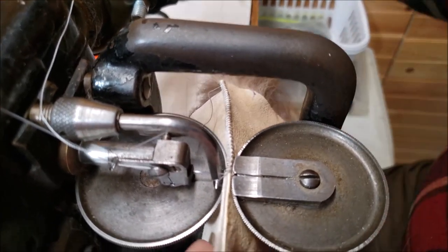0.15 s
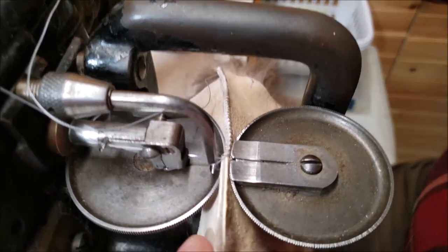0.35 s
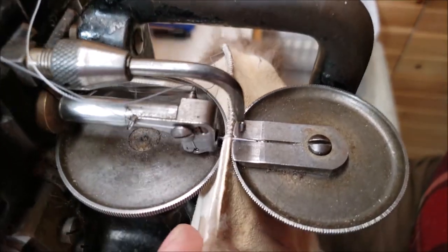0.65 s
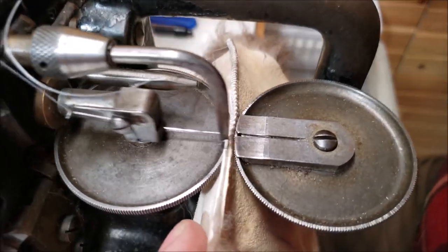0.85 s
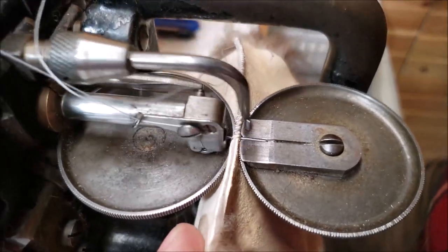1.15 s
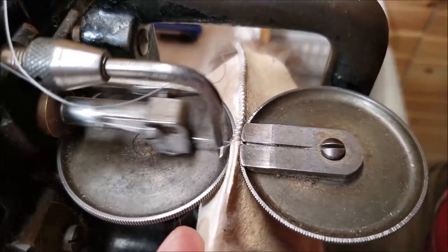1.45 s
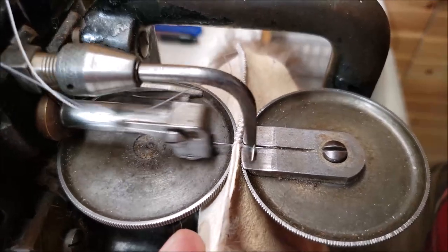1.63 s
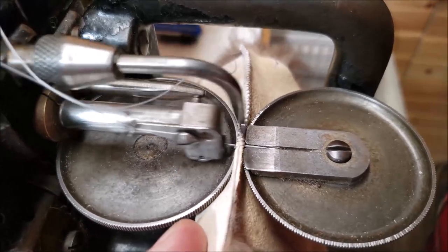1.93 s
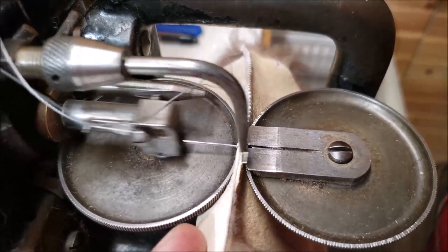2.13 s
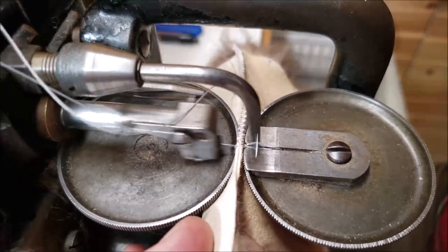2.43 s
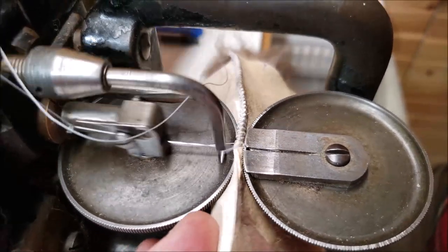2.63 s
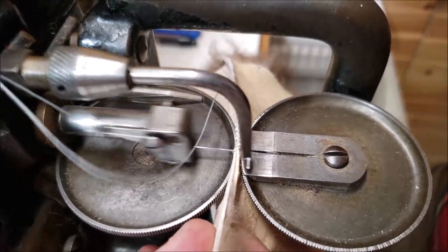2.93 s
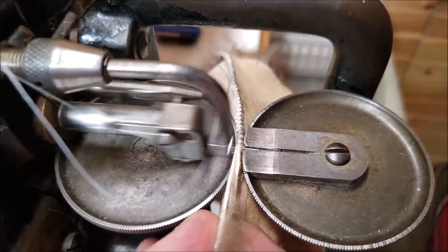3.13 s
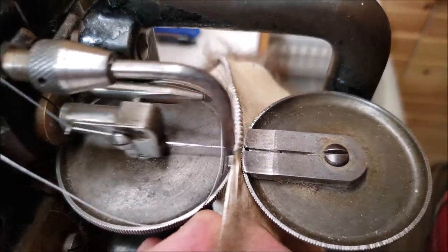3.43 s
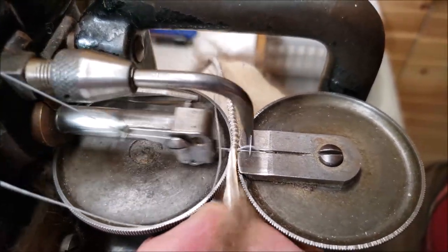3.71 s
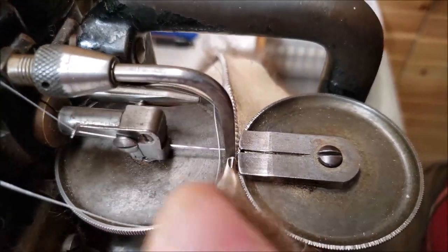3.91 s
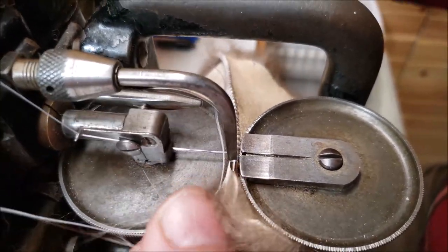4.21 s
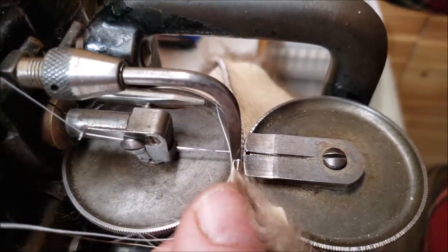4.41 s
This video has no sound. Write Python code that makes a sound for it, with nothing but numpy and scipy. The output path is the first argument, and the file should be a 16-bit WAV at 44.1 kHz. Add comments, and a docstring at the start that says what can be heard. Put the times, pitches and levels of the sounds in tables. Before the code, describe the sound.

An old hand-cranked sewing machine stitches fur close to the microphone in a small, quiet room. It starts with a few light clicks and a soft table thump, then settles into quick metallic ticks, clacks and rattles, a little over two stitches a second, with a thin scrape on each. Two harder snaps stand out midway. Near the end it stops, leaving a faint rustle of fingers on fur.

```python
"""Hand-cranked fur sewing machine

The machine stitches close to a phone, then stops. Cams, looper and feed ratchet excite the modes of
its steel parts by impact and by friction; the cast frame and table rumble, and fingers rustle the fur.
The phone's two microphone ports colour the sound very differently, and the right one hears it later."""
import sys
import numpy as np
from scipy import signal
from scipy.fft import rfft, irfft
from scipy.io import wavfile
from scipy.ndimage import uniform_filter1d

SR = 44100
rng = np.random.default_rng(int(sys.argv[2]) if len(sys.argv) > 2 else 0)


def to_wav(sig):
    """Store sig (one row per channel, or 1-D mono) as 16-bit WAV at the path in sys.argv[1].

    Samples outside -1..1 are clipped; the rate is SR.
    """
    pcm = np.clip(np.atleast_2d(sig), -1, 1) * 32767
    pcm = np.round(pcm).astype(np.int16)
    wavfile.write(sys.argv[1], SR, pcm.T)  # frames by channels


N = 201349
T = np.arange(N) / SR


def undb(db):
    """Amplitude ratio of a level in decibels."""
    return 10 ** (np.asarray(db) / 20)


def unit(x):
    """Normalisation to an rms of 1 along time."""
    return x / np.sqrt(np.mean(x ** 2, axis=-1, keepdims=True))


def level_curve(table):
    """Linear interpolation of levels in dB over time, silent outside the table."""
    return np.interp(T, *np.transpose(table), left=-120, right=-120)


def decay(t, t60):
    """Exponential damping: a fall of 60 dB in t60."""
    return np.exp(-np.log(1000) * t / t60)


def swells(times, db, sigma_s):
    """Gaussian envelopes centred on the given times."""
    rows = zip(*np.broadcast_arrays(times, db, sigma_s))
    return sum(undb(level) * np.exp(-.5 * ((T - s) / sigma) ** 2) for s, level, sigma in rows)


def pair(draw, coherence):
    """Partial coherence: two ports facing different sides of a source share only part of its power."""
    return np.sqrt(coherence) * draw() + np.sqrt(1 - coherence) * np.array([draw(), draw()])


def grains(spread_db):
    """Surface roughness: dense tiny contacts of very uneven, but bounded, size."""
    size = np.minimum(rng.exponential(size=N), 6)
    return rng.standard_normal(N) * undb(spread_db * size)


def resonate(force, peaks):
    """Forced vibration of broad resonances in parallel, each made of two band-passes in series."""
    out = 0
    for hz, width, db in peaks:
        wide = signal.lfilter(*signal.iirpeak(hz, hz / width / 2, SR), force)
        out = out + undb(db) * signal.lfilter(*signal.iirpeak(hz, hz / width, SR), wide)
    return unit(out)


# Room tone. Each row: frequency in Hz, spectral density in dB.
AIR_SPECTRUM = [(40, -90), (100, -105), (250, -102), (500, -112), (2000, -116), (6000, -114), (12000, -112),
                (16000, -110)]


def room_tone():
    """Diffuse background noise is almost incoherent between the ports."""
    hz, db = np.transpose(AIR_SPECTRUM)
    tilt = undb(np.interp(np.log(np.fft.rfftfreq(N, 1 / SR) + 1), np.log(hz), db))
    noise = pair(lambda: rng.standard_normal(N), coherence=0.074)
    return irfft(rfft(noise) * tilt, N) * np.sqrt(SR / 2)


# Resonances of the table. Each row: frequency in Hz, bandwidth in Hz, relative level in dB.
TABLE_MODES = [(53, 44, 13), (68, 19, 9), (93, 110, -18)]
# Shaking of the table. Each row: time in seconds, level in dB before each port's gain.
SHAKE_LEVELS = [(0.0, -60), (0.08, -74), (0.14, -52.5), (0.33, -59), (0.37, -39.5), (0.53, -65.5),
                (0.57, -50), (0.63, -68.5), (1.09, -64), (1.35, -49.5), (1.6, -59), (1.64, -49.5),
                (3.1, -62.5), (3.29, -47.5), (3.46, -62), (3.66, -53.5), (3.88, -64), (3.93, -48),
                (4.19, -68), (4.57, -73.5)]


def table_shake():
    """Random forcing of the table's low resonances makes a rumble, stronger at the right port."""
    force = pair(lambda: rng.standard_normal(N), coherence=0.67)
    return resonate(force, TABLE_MODES) * undb(level_curve(SHAKE_LEVELS)) * undb([[-1.5], [2.5]])


# Soft knocks. Each row: start in seconds, relative level in dB, frequency in Hz, T60 in seconds.
TABLE_KNOCKS = [(.002, -45.5, 59, 0.078), (0.15, -36, 111, 0.032), (0.266, -32.5, 94, 0.013),
                (0.353, -38.5, 92, 0.08), (0.356, -37.5, 780, 0.012), (0.377, -54, 88, 0.067),
                (0.421, -51, 79, 0.086), (.565, -35, 85, 0.036), (2.585, -29, 537, 0.033)]


def table_knocks():
    """Structure-borne knocks: damped sinusoids that reach the right port best."""
    out = 0
    for start, db, hz, t60 in TABLE_KNOCKS:
        t = np.clip(T - start, 0, None)
        out = out - np.sin(2 * np.pi * hz * t) * decay(t, t60) * undb(db)
    return out * undb([[-1], [5.5]])


# Spectrum of the fur. Each row: frequency in Hz, bandwidth in Hz, relative level in dB.
FUR_BANDS = [(2670, 400, -3), (4000, 1740, -1.5), (5020, 1100, 4), (11400, 3400, -1.5)]
# Finger strokes. Each row: centre in seconds, level in dB, Gaussian sigma in seconds.
FINGER_STROKES = [(0.112, -71.5, 0.031), (0.268, -64, 0.014), (3.976, -73, 0.06), (4.087, -60.5, 0.027),
                  (4.233, -59.5, 0.013), (4.293, -73, 0.015), (4.461, -63.5, 0.02), (4.565, -65.5, 0.017)]


def fur_rustle():
    """Friction noise: hairs slip under the fingers near the right port, over a faint steady brushing."""
    envelope = undb(-71.5) + swells(*np.transpose(FINGER_STROKES))
    return resonate(grains(spread_db=1.5), FUR_BANDS) * envelope * undb([[-14], [0]])


# How hard the crank is turned. Each row: time in seconds, level in dB relative to full effort.
CRANK_EFFORT = [(0, -32), (.3, -40), (.38, -28), (.5, -20.5), (.78, -19), (.94, -11), (1.11, -11.5),
                (1.23, -5), (1.6, -4), (1.83, 5.5), (1.98, -3), (2.25, -1.5), (2.48, -4), (2.8, -3.5),
                (3.16, 0), (3.42, -4), (3.85, -6), (4.05, -16), (4.13, -28), (4.57, -22)]


def effort_gain(full_db, exponent):
    """Power law: amplitude grows with the effort on the crank."""
    return undb(full_db + exponent * level_curve(CRANK_EFFORT))


# Resonances of the cast frame. Each row: frequency in Hz, bandwidth in Hz, relative level in dB.
FRAME_MODES = [(174.2, 58, -6), (204.4, 38, -1.5), (282.5, 46, 2.5), (391, 110, -11)]
# The feed pulls the fur on once a stitch. Each row: time in seconds, rasp, groan and squeak in dB.
FEED_PULLS = [(1.047, -54, -67, -39), (1.472, -43, -43.5, -38), (1.893, -47.5, -41, -35),
              (2.32, -41.5, -42, -29), (2.728, -46.5, -42.5, -30), (3.149, -43.5, -43, -35),
              (3.572, -52, -49, -40)]
# Short low groans and dull rubs of the frame, near some of the blows.
# Each row: time in seconds, groan in dB, dull rub in dB.
FRAME_RUBS = [(0.391, -54, -81), (0.899, -51, -59), (1.701, -45.5, -52), (1.783, -46, -53),
              (2.192, -44, -54.5), (2.595, -47, -50.5), (3.27, -57, -75.5), (3.913, -44.5, -53.5)]


def frame_groan():
    """Forced vibration of the cast frame follows the crank's effort and swells at pulls and rubs."""
    feed_s, _, feed_groan_db, _ = np.transpose(FEED_PULLS)
    rub_s, rub_groan_db, _ = np.transpose(FRAME_RUBS)
    load = effort_gain(full_db=-54.5, exponent=0.9)
    load += swells(feed_s + 0.021, feed_groan_db, sigma_s=0.02)  # the groan lags the pull
    load += swells(rub_s, rub_groan_db, sigma_s=0.014)
    force = pair(lambda: unit(grains(spread_db=3.35)), coherence=1)
    return resonate(force, FRAME_MODES) * load


# Modes of the parts, one list each for frame, crank, arms, discs, looper and needle.
# Each row: frequency in Hz, relative level in dB, free T60 in seconds.
PART_MODES = [
    [(499, 8, 0.0068), (726, -0.5, 0.029), (824, 0.5, 0.072), (942, 15.5, 0.031), (1024, 12, 0.039)],
    [(1363, -24, .03), (1662, 4, 0.012), (2078, 5, 0.018), (2280, 0.5, 0.022)],
    [(2343, 11.5, 0.04), (2560, -22, 0.034), (2674, -3.5, 0.098), (3145, 16.5, 0.0067), (3037, -9.5, 0.035)],
    [(3970, -14, 0.023), (4105, -9.5, 0.007), (4265, -13.5, 0.0044), (5020, -25, 0.025)],
    [(5040, -8, 0.0089), (5660, 9, 0.026), (6310, 8.5, 0.0083), (7050, 3, 0.019)],
    [(9480, 4.5, 0.004), (11500, -15.5, 0.01), (10850, 2.5, 0.021), (11610, 4, .012), (12400, 7, 0.0022),
     (12600, -6.5, 0.0043), (13500, 1, .006), (15020, 2.5, 0.0099), (14840, -0.5, 0.012),
     (16200, -7.5, 0.0119)],
]
# Each entry: the fraction of one part's power that is common to both ports.
PART_COHERENCE = [0.74, 0.48, 0.32, 0.35, 0.73, 0.55]


def ring(force, modes, spot_db=0, t60_scale=1):
    """Modal superposition: a part rings in its modes, weighted by the spot that is hit."""
    t = T[:2560]
    hz, db, t60 = np.array(modes).T[:, :, None]
    onset = (1 - np.exp(-t * hz / 0.15)) ** 2  # a mode needs about a cycle to build up
    crack = 6.4 * decay(t, 0.0023)  # fills the gaps between the modes
    tones = onset * np.sin(2 * np.pi * hz * t) * (decay(t, t60_scale * t60) + crack)
    tones[1::2] *= -1  # neighbours swing in opposite sense, avoiding deep antiresonances
    response = undb(db.T + spot_db) @ tones
    response = response.reshape((1,) * (force.ndim - 2) + response.shape)
    return signal.fftconvolve(force, response, axes=-1)[..., :force.shape[-1]]


# Bright hiss of thread and needle. Each row: time in seconds, relative level in dB.
THREAD_HISS = [(0, -96), (.33, -94), (.47, -68), (.78, -90), (.94, -73), (1.23, -69), (1.6, -63),
               (1.83, -50), (1.98, -65), (2.17, -60), (2.33, -61), (2.48, -67), (2.8, -64.5), (3.1, -59),
               (3.3, -67), (3.6, -62), (3.73, -71), (3.89, -60), (4.05, -78), (4.57, -84)]
# Each entry: the gain in dB of one part when rubbed.
RUBBED_GAINS_DB = [7, 2.5, -5, -7.5, -3, 8]


def scrape():
    """Stick-slip friction: cams and thread slide in uneven grains that excite the parts' modes."""
    feed_s, rasp_db, _, _ = np.transpose(FEED_PULLS)
    rub_s, _, rub_db = np.transpose(FRAME_RUBS)
    rasp = swells(feed_s - 0.011, rasp_db, sigma_s=0.018)  # the rasp leads the pull
    rub = swells(rub_s, rub_db, sigma_s=0.014)
    arms = effort_gain(full_db=-50, exponent=1) + rasp + rub * undb(-11)
    frame = effort_gain(full_db=-58, exponent=1.18) + rasp * undb(-10.5) + rub
    needle = undb(level_curve(THREAD_HISS)) + rasp * undb(-6) + rub * undb(-6.5)
    envelopes = [frame, frame, arms, arms, arms, needle]
    grip_steps = np.repeat(rng.standard_normal(N // 300 + 1), 300)[:N]
    grip = undb(2.6 * unit(uniform_filter1d(grip_steps, size=300)))
    snags_per_s, snag_t60_s = 25, 0.0061  # burrs catch as tiny ticks
    burrs = (rng.random(N) < snags_per_s / SR) * undb(7 + 2 * rng.standard_normal(N))
    snags = 1 + signal.lfilter([1], [1, -decay(1 / SR, snag_t60_s)], burrs)
    out = 0
    for modes, envelope, db, coherence in zip(PART_MODES, envelopes, RUBBED_GAINS_DB, PART_COHERENCE):
        friction = pair(lambda: unit(grains(spread_db=5.7)), coherence) * grip * snags
        ringing = ring(friction, modes, t60_scale=0.2)  # sliding contact adds damping
        out = out + unit(ringing) * envelope * undb(db)
    return out


# Eight kinds of blow follow. Each row: time in seconds, relative level in dB, brightness in dB per
# part from frame to needle.
# Dull taps of the cams.
TAPS = [(.333, -45, -3.3), (.5337, -41.5, 3.2), (.661, -48, 0.19), (.74, -46, 2), (.8832, -32, -0.2),
        (.982, -41.5, -0.45), (1.1206, -32.5, 1.2), (1.3493, -35, 0.95), (1.5757, -25.5, -0.65),
        (2.173, -41, -0.29), (2.585, -29.5, 1.5), (2.6378, -25, -2.1), (2.804, -26, -1.5),
        (3.018, -30.5, -0.25), (3.2265, -29.5, 1.4), (3.4505, -25, 0.74), (3.8881, -30.5, 1.7),
        (4.5097, -36, 2.8)]
# Very short dry nicks.
NICKS = [(.3545, -41, -1), (.597, -45.5, 2), (.6972, -35.5, 3), (2.2326, -29, -6)]
# The drive engages as the crank starts.
ENGAGE = [(.3628, -21, 0)]
# The full clack that closes each stitch.
CLACKS = [(.4242, -26, 1.5), (.7838, -21.5, -1), (1.2675, -16, -1), (1.6579, -19.5, -3.5),
          (1.6924, -17, 0.5), (2.109, -17, 0.5), (2.2977, -23.5, 0.5), (2.5169, -15, -0.5),
          (2.9398, -15, 0), (3.275, -22, -0.5), (3.3687, -16.5, -0.5), (3.796, -21.5, -0.5)]
# Thin ticks of needle, looper and feed ratchet.
TICKS = [(.5043, -48, 1.4), (1.0834, -37, -0.55), (1.0983, -33.5, -0.62), (1.5221, -29.5, -0.078),
         (1.943, -27, -0.85), (2.359, -28.5, -0.091), (2.77, -31, 0.32), (2.8673, -33.5, 0.74),
         (3.1934, -31, -0.38), (3.4066, -38, -0.84), (3.6212, -25.5, -1), (3.6574, -39, -1.4),
         (3.875, -35.5, -1.2), (4.2564, -33.5, 2.2)]
# Loose arms rattle while the feed pulls.
RATTLES = [(.703, -43, 0.24), (1.3718, -39, 0), (1.41, -35.5, -0.53), (1.4601, -23, -1.7),
           (1.8243, -36, 0.11), (1.8544, -30, 0.54), (1.9734, -33, 0), (2.2618, -34, 0),
           (2.2871, -29.5, 0.91), (2.4146, -34.5, 0), (2.6662, -32.5, -0.9), (2.6913, -33, 0.14),
           (2.9044, -33, -0.92), (3.1102, -30.5, 0.95), (3.1268, -24, 0), (3.3113, -23, -0.79),
           (3.5275, -36, 0.45), (3.549, -32, 0.95), (3.5761, -26, -0.71), (3.7611, -31.5, -1.3)]
# An arm drops into place, mostly just before the clack.
LATCHES = [(1.0076, -34, 1), (1.213, -27.5, 0), (1.4462, -29, 0.55), (1.6386, -28, 0.71), (1.989, -26, 0),
           (2.0552, -23.5, 0), (2.4656, -24.5, 0.99), (2.8859, -24.5, 0.12), (2.9796, -35, 0),
           (3.088, -33.5, 0.27), (3.3227, -19, 0.19), (3.7365, -24.5, 0)]
# The crank takes up its play with a hard snap.
SNAPS = [(1.7624, -25, -2.7), (1.7727, -11.5, -1.6), (2.1802, -8.5, 0.93)]
# Each row: a table of blows, the six parts' shares in dB, base chatter time in seconds.
BLOW_KINDS = [(CLACKS, [-28, -25, -6.5, -11.5, -16.5, -15], 0.038),
              (LATCHES, [-21.5, -41, -2, -16.5, -23.5, -34.5], 0.027),
              (TICKS, [-25, -26, -61, -10.5, -10, -12.5], 0.048), (TAPS, [-24, -17.5, -10, -11, -25, -30],
              0.051), (RATTLES, [-19.5, -12.5, -1.5, -13, -17, -23.5], 0.073),
              (SNAPS, [-26, -10.5, -31, -10.5, -30, -24.5], 0.032),
              (ENGAGE, [-52, -13, -3, -7.5, -17.5, -19], 0.041), (NICKS, [-28, -14, -4.5, -18, -20.5, -37],
              .008)]
# Each entry: the gain in dB of one part when struck.
STRUCK_GAINS_DB = [7.5, 2.5, -5.5, 0, 9.5, 14]


def clicks():
    """Impact excitation: each blow is a quick contact and a dying chatter that ring every part."""
    rank = np.arange(len(PART_MODES)) - 2  # brightness pivots on the arms
    rows = np.array([[s, chatter_s, *(db + np.array(shares) + brightness * rank)]
                     for table, shares, chatter_s in BLOW_KINDS for s, db, brightness in table])
    times, chatter_s, part_db = rows[:, 0], rows[:, 1:2], rows[:, 2:]
    t = T[:4096]
    blows = 0
    for k, modes in enumerate(PART_MODES):
        time_scale = 0.92 ** k  # smaller parts are struck more sharply and settle sooner
        attack = 1 - np.exp(-t / (0.0013 * time_scale))
        chatter = 20 * chatter_s * decay(t, chatter_s * 1.43 * time_scale)  # longer is also louder
        envelope = attack * (decay(t, 0.011) + chatter)
        force = envelope * pair(lambda: rng.standard_normal(envelope.shape), PART_COHERENCE[k])
        ringing = ring(force, modes, spot_db=5.5 * rng.standard_normal((len(rows), len(modes))))
        energy = np.mean(np.sum(ringing ** 2, axis=-1, keepdims=True), axis=0)
        gain = 10 * undb(part_db[:, k] + STRUCK_GAINS_DB[k])[:, None]
        blows = blows + gain * ringing / np.sqrt(energy)
    out = np.zeros((2, N + 2 * len(t)))
    for j, s in enumerate(times):
        start = int((s - .0005) * SR)  # first contact comes a little before the peak
        out[:, start:start + len(t)] += blows[:, j]
    return out[:, :N]


def squeaks():
    """Frequency modulation: a brief wavering whistle once a stitch, probably thread over steel."""
    centre_hz = 12030
    waver = 1 + 0.05 * unit(uniform_filter1d(rng.standard_normal(N), size=90))
    feed_s, _, _, squeak_db = np.transpose(FEED_PULLS)
    whistle = np.sin(2 * np.pi * np.cumsum(centre_hz * waver) / SR)
    return swells(feed_s, squeak_db, sigma_s=0.0043) * whistle


def reverberation(source, t60):
    """Dense reflections form an exponentially decaying noise response of unit energy."""
    t = T[:SR // 2]
    response = rng.standard_normal((2, len(t))) * decay(t, t60) * (t > .004)
    response = signal.lfilter([1], [1, -.3], response)  # walls dull the treble
    response /= np.sqrt(np.sum(response ** 2, axis=-1, keepdims=True))
    return signal.fftconvolve(source, response, axes=-1)[:, :N]


def scene():
    """Superposition of the mechanism, its reverberation, the rumble, the fur and the room tone."""
    machine = clicks() + scrape() + squeaks()
    room = undb(-15) * reverberation(machine, t60=0.16)
    rumble = frame_groan() + table_shake() + table_knocks()
    return machine + room + rumble + fur_rustle() + room_tone()


# Response of the microphone ports. Each row: frequency in Hz, left gain in dB, right gain in dB.
PORT_RESPONSE = [(100, 0, -1), (350, 0, -1.5), (900, 0, -5), (1900, 0, 0), (2700, 0, 11), (3500, -2, 5),
                 (4400, -1, 7), (6400, -2, -9), (7500, -6, -24), (8400, -15, -24), (10000, -8, -11),
                 (12400, -5, -8), (15500, -8, -38), (16400, -22, -55)]


def record(dry):
    """Minimum-phase filtering colours each port; the right one lags, and the top is cut steeply."""
    size, right_lag_s, top_hz = 2048, 0.0003645, 16500
    hz, *ports = np.transpose(PORT_RESPONSE)
    grid_hz = np.fft.rfftfreq(size, 1 / SR)
    log_gain = np.log(undb([np.interp(np.log(grid_hz + 1), np.log(hz), db) for db in ports]))
    cepstrum = irfft(log_gain, size)
    cepstrum[:, 1:size // 2] *= 2  # folding the cepstrum gives minimum phase
    cepstrum[:, size // 2 + 1:] = 0
    lag = np.exp(-2j * np.pi * grid_hz * np.array([[0], [right_lag_s]]))
    response = irfft(np.exp(rfft(cepstrum)) * lag, size)[:, :size // 2]
    heard = signal.fftconvolve(dry, response, axes=-1)[:, :N]
    bass_cut = signal.butter(3, 38, "high", fs=SR, output="sos")  # small capsules lose the deepest bass
    top_cut = signal.ellip(10, .2, 80, top_hz, fs=SR, output="sos")
    return signal.sosfilt(top_cut, signal.sosfilt(bass_cut, heard))


dry = scene()
out = record(dry)
to_wav(out)
```